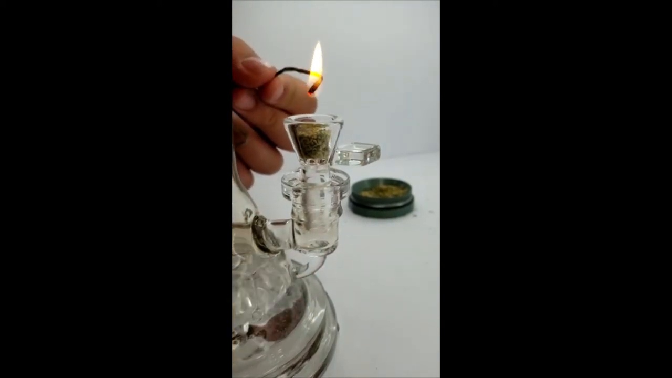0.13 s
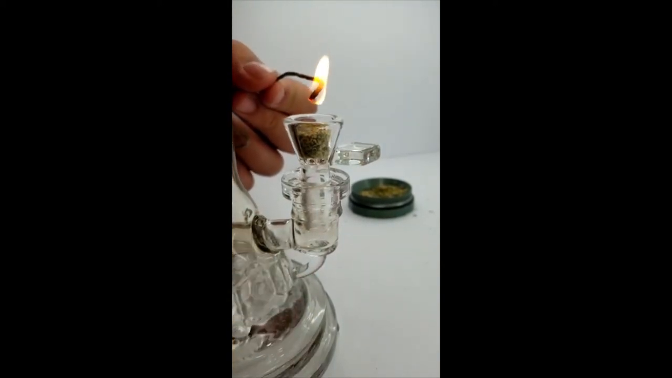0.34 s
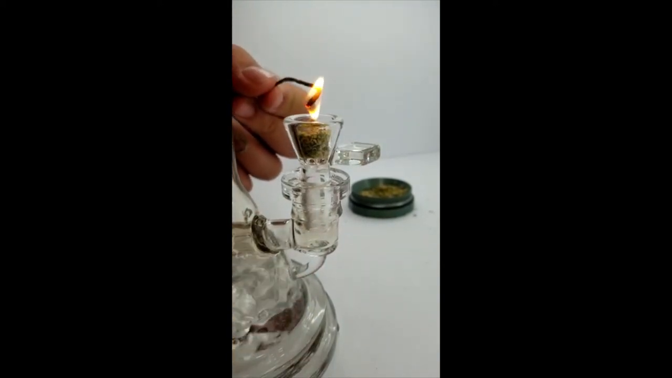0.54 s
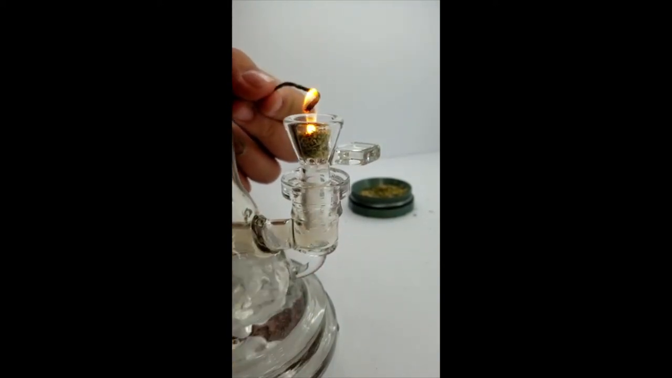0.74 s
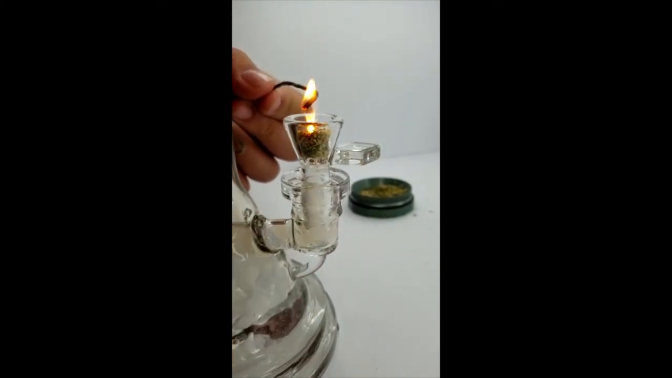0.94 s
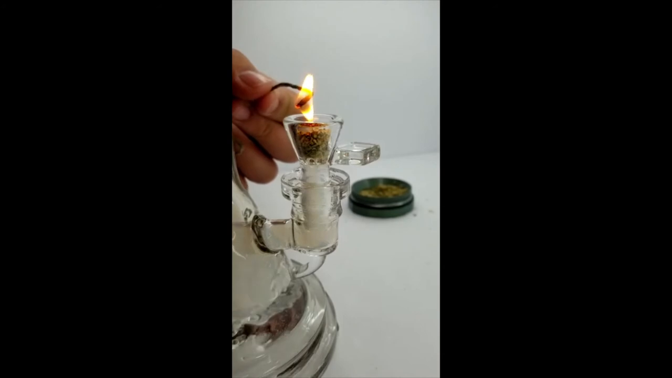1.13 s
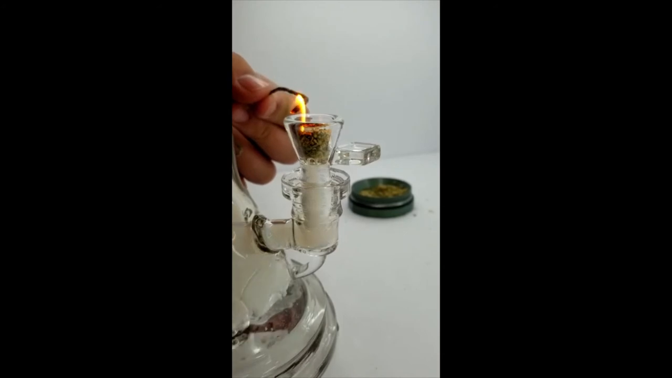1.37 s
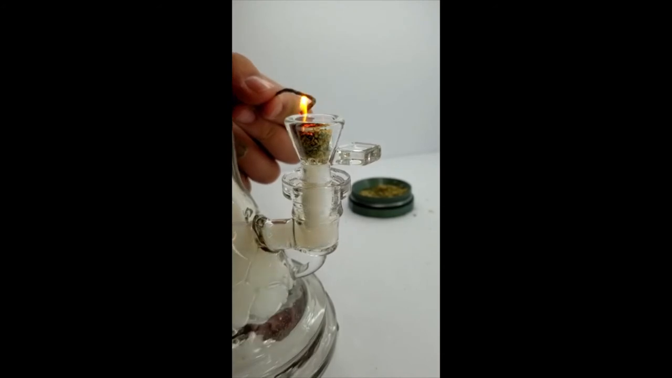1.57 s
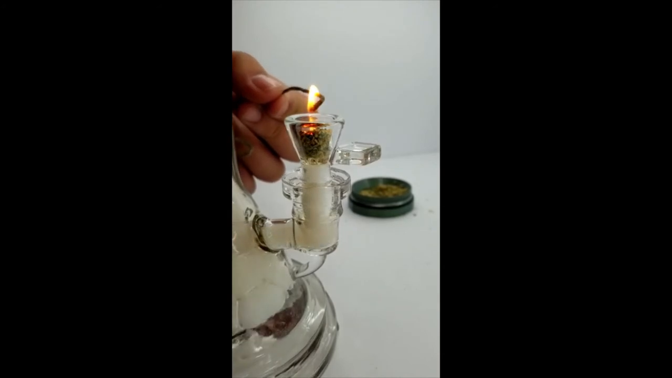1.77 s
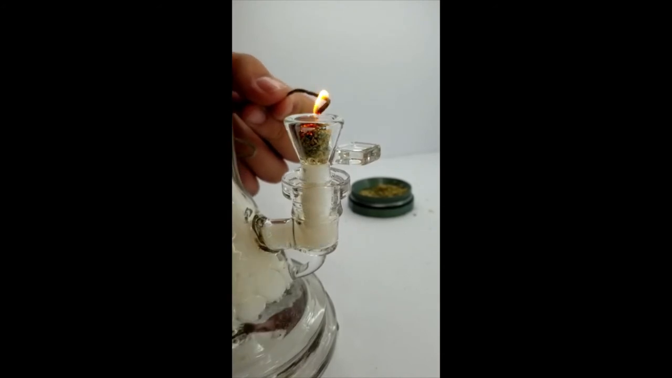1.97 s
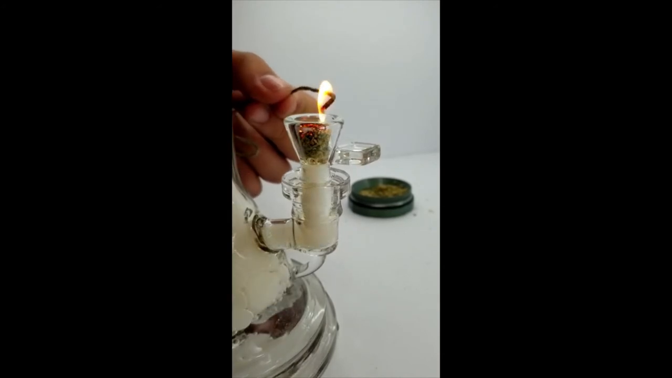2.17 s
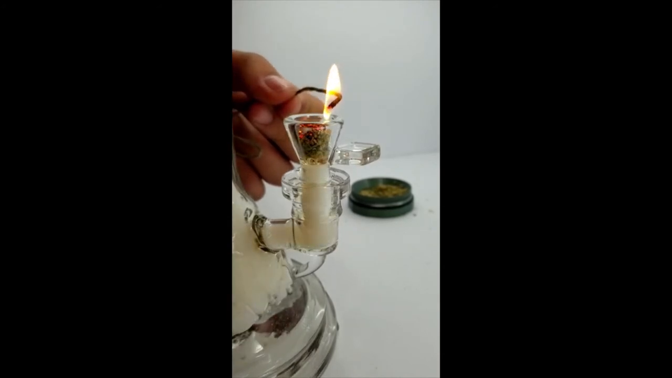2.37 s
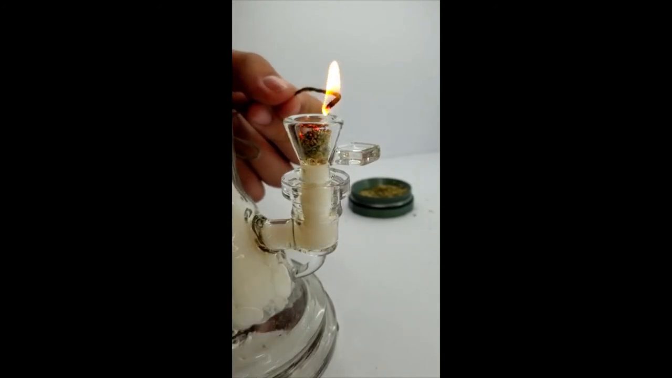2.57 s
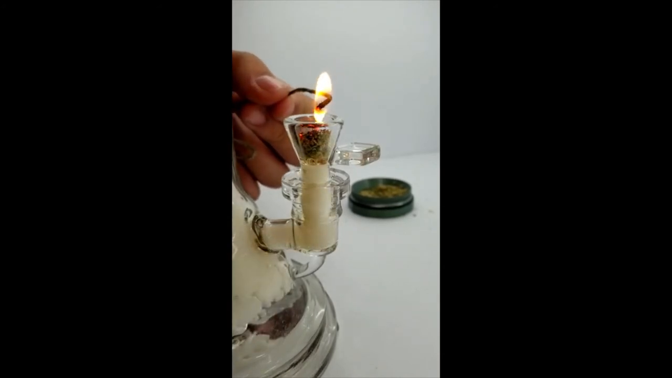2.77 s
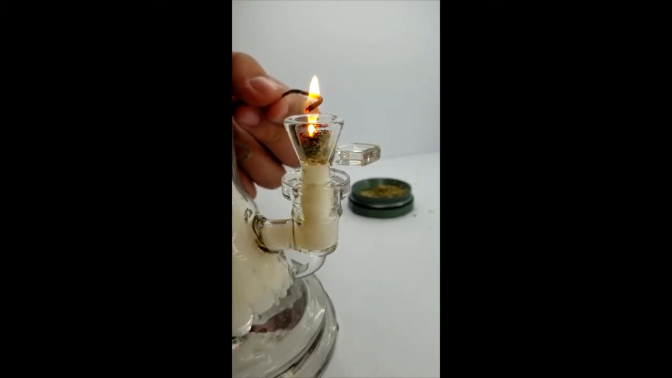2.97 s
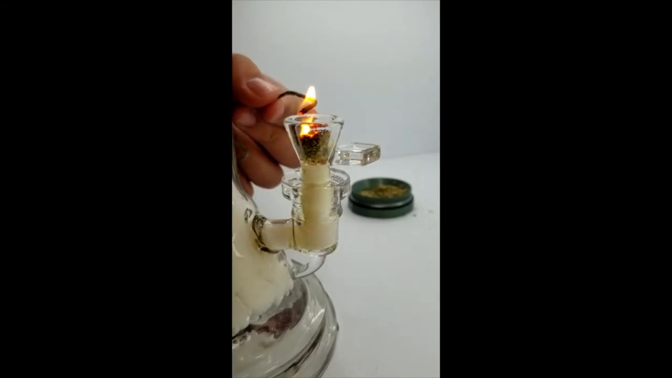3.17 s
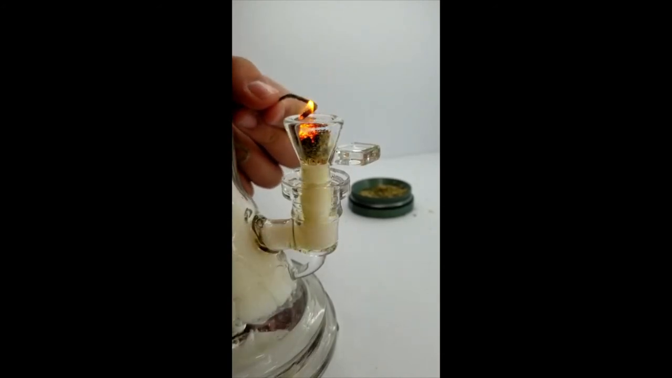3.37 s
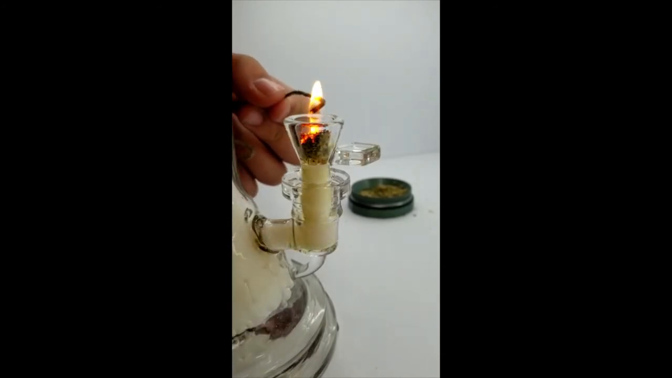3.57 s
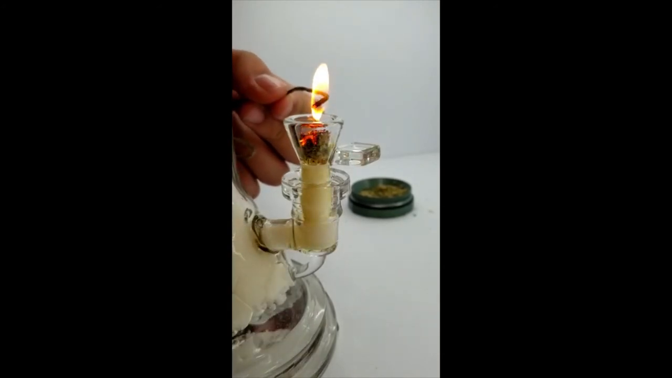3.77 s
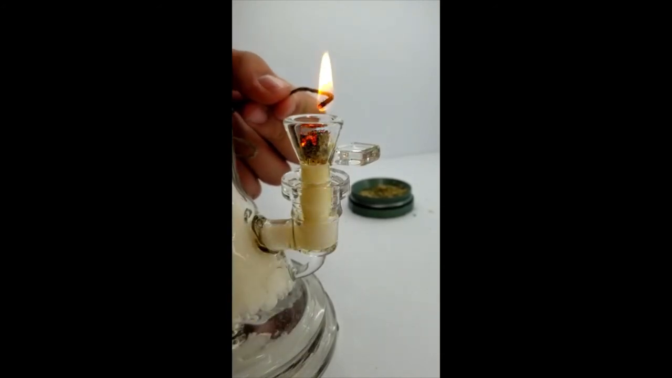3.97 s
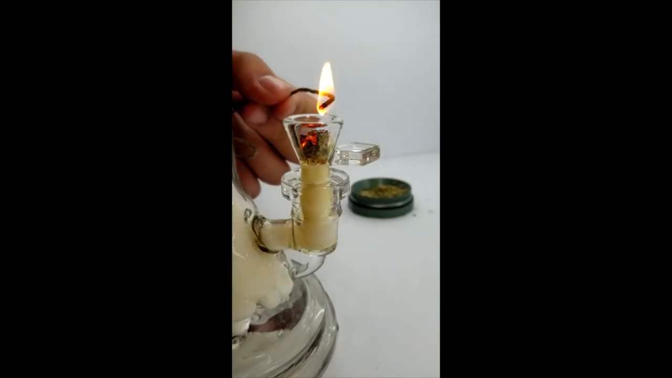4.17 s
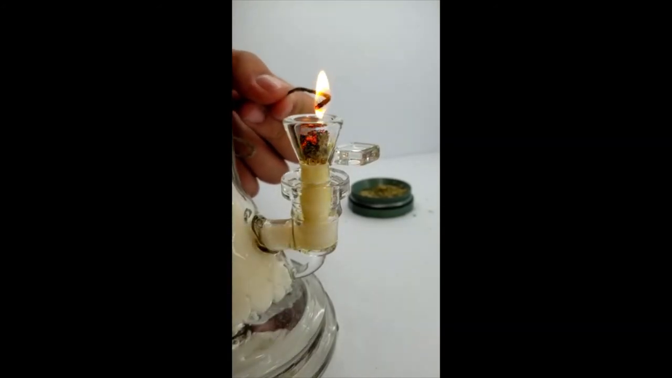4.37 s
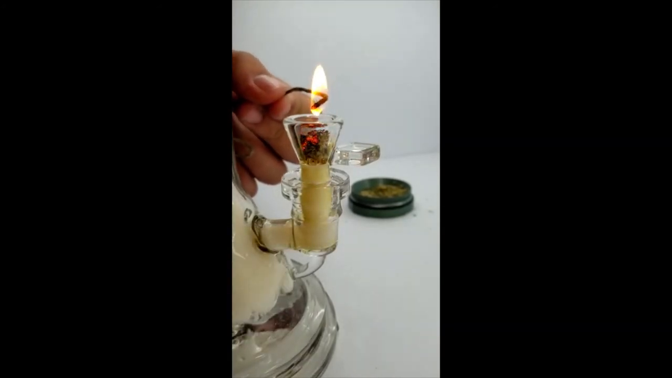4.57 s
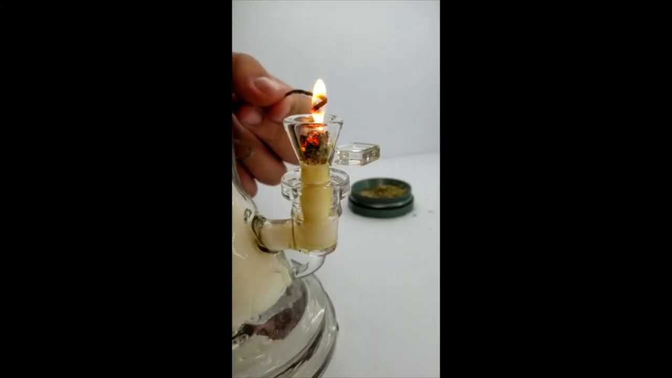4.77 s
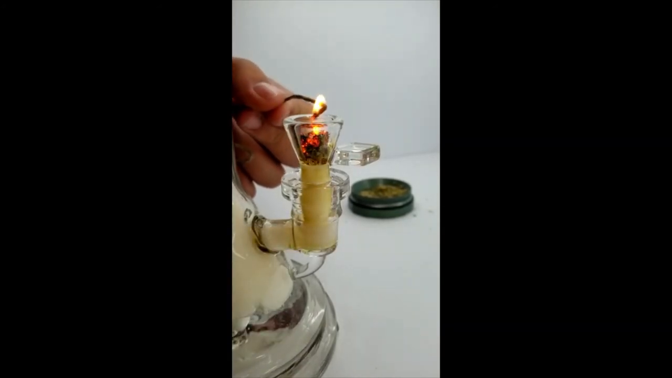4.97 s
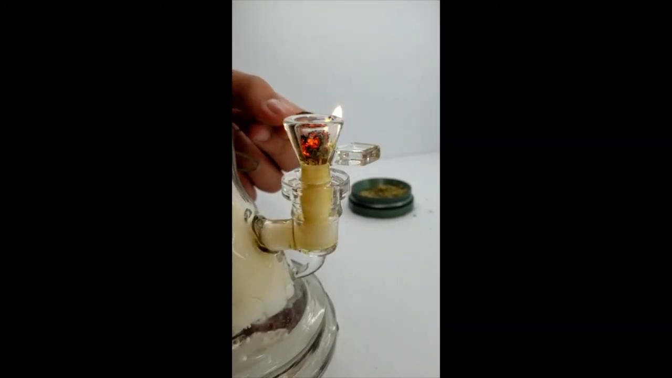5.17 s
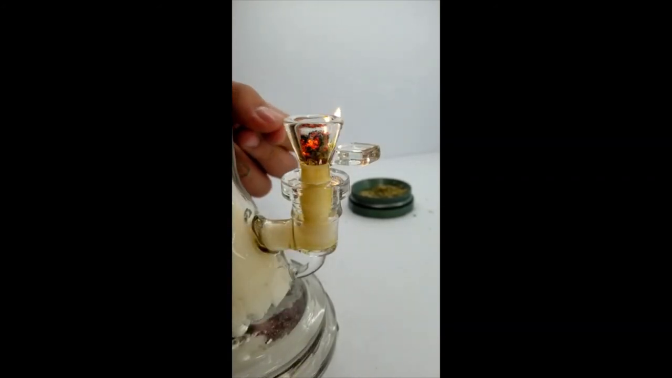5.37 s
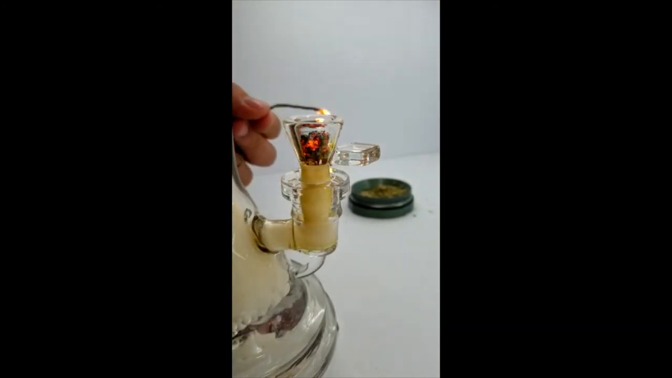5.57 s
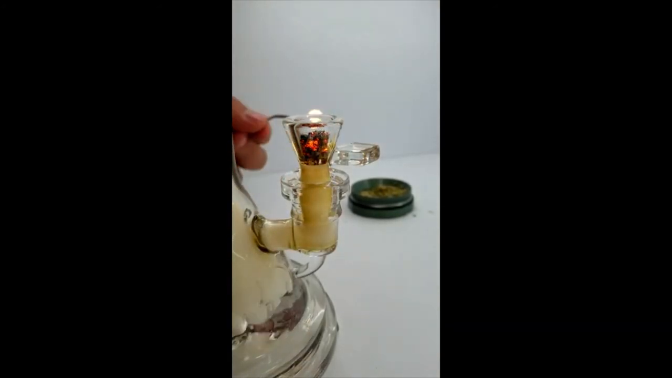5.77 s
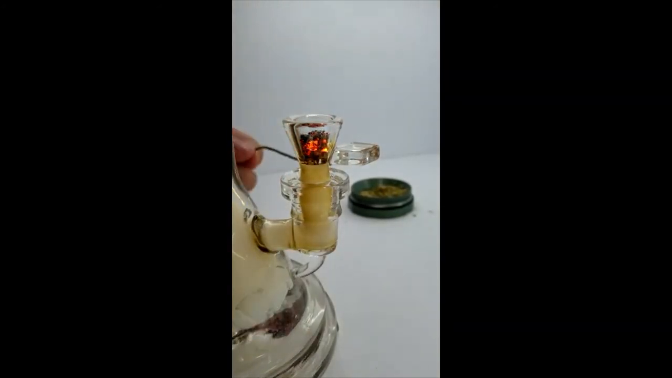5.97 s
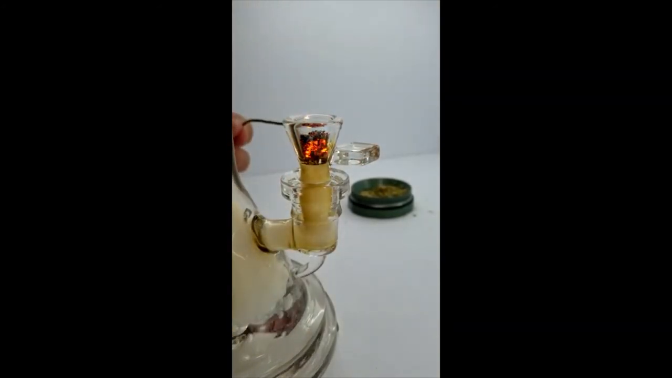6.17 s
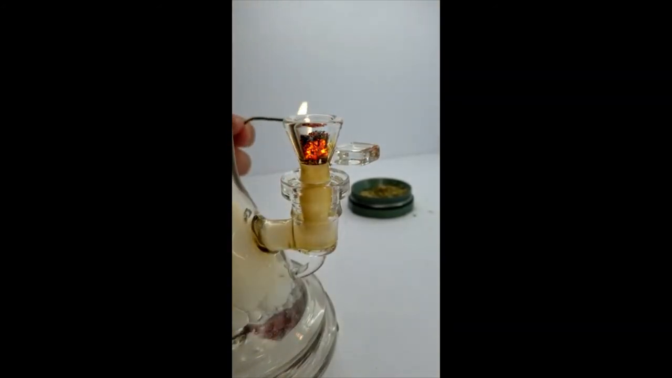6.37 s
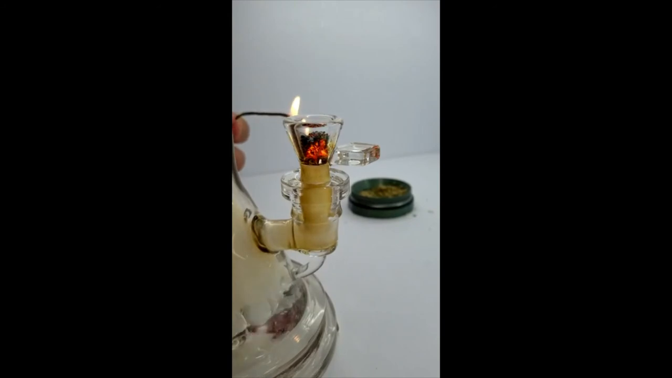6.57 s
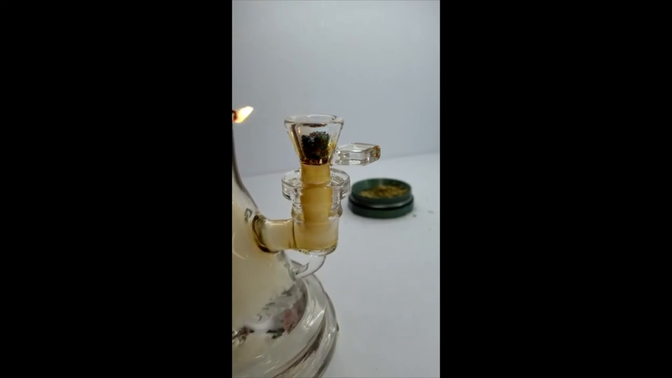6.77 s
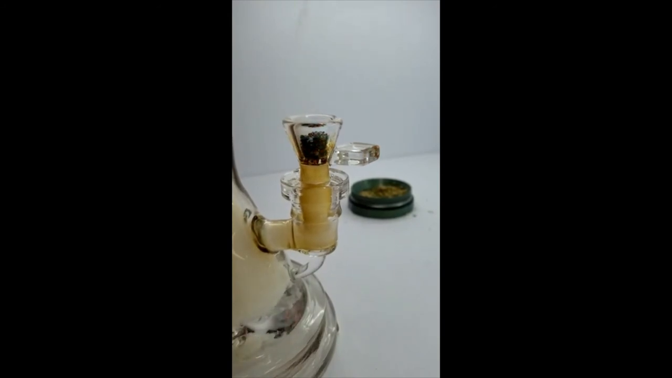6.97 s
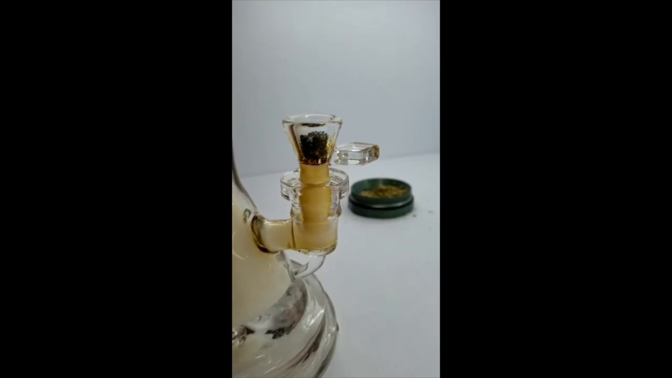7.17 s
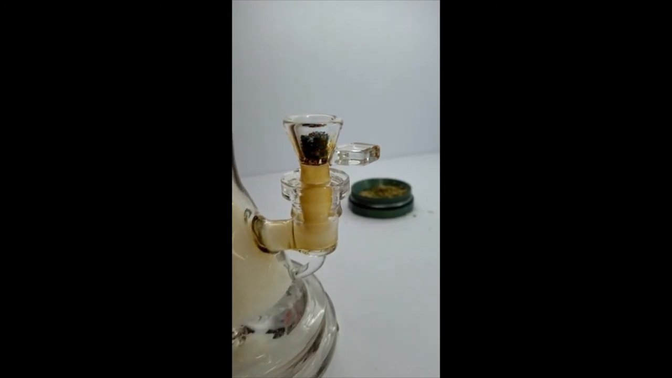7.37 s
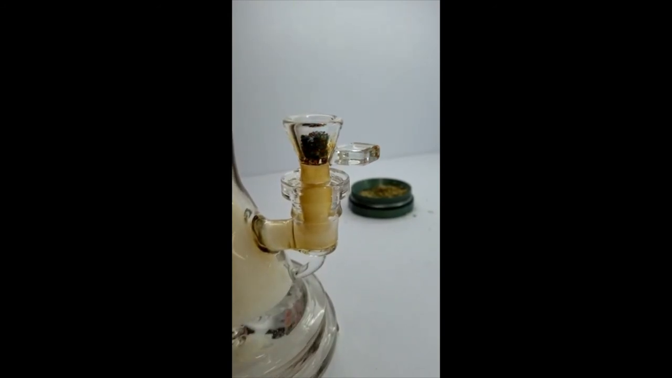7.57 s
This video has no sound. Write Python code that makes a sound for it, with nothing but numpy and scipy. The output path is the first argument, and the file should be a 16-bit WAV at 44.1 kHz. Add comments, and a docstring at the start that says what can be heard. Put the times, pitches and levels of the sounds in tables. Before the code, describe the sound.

Rapid glassy bubbling with soft hiss and ember snaps builds for several seconds, opens into a loud resonant airy rush, then stops abruptly.

```python
"""On a table close by, air is drawn through the water of a glass pipe while a flame is held to its bowl.
Big bubbles jolt the ringing chamber, burst with gliding notes and throw noise-burst spray up the neck.
Drops splash and ping on the glass, foam ticks, and embers snap and crackle as filtered clicks.
Filtered noise hisses through the bowl, grows as it burns clear, and catches hold as the flame arrives.
Once the air hole is uncovered a resonant rush builds; soon after, the flow is cut off steeply."""
import sys
import numpy as np
from scipy import signal
from scipy.fft import rfft, irfft, next_fast_len
from scipy.io import wavfile
from scipy.ndimage import map_coordinates

SR = 44100
rng = np.random.default_rng(int(sys.argv[2]) if len(sys.argv) > 2 else 0)


def master(y):
    """Save y as 16-bit WAV."""
    cut = np.clip(np.atleast_2d(y).T, -1, 1)
    pcm = np.round(cut * 32767)  # scale
    wavfile.write(sys.argv[1], SR, pcm.astype(np.int16))


N = 335601
TIME = np.arange(N) / SR
SIZE = next_fast_len(N, real=True)
FREQS = np.maximum(np.arange(SIZE // 2 + 1) * SR / SIZE, 1)

# biggest bubbles tearing off the stem: (time [s], relative level [dB])
GULPS = [(0.0308, -32), (0.041, -35), (0.1073, -36.5), (0.1561, -31), (0.2475, -35), (0.284, -36),
         (0.382, -39), (0.4606, -35.5), (0.511, -33.5), (0.578, -32), (0.6326, -35), (0.6796, -38),
         (0.7451, -35), (0.757, -43), (0.814, -39), (0.8485, -35.5), (0.915, -34.5), (0.9671, -31),
         (1.076, -39), (1.13, -40.5), (1.1522, -30.5), (1.19, -33), (1.2246, -36), (1.2648, -31.5),
         (1.3153, -35), (1.331, -32.5), (1.3877, -35.5), (1.4395, -35.5), (1.4586, -35.5), (1.5395, -40),
         (1.5991, -36), (1.666, -35), (1.71, -36.5), (1.771, -39.5), (1.88, -36), (1.9808, -37.5),
         (2.04, -35.5), (2.1228, -33.5), (2.185, -31.5), (2.343, -35.5), (2.396, -38), (2.4636, -38),
         (2.519, -36), (2.534, -36), (2.67, -33.5), (2.7348, -36.5), (2.8706, -37), (2.9438, -35.5),
         (3.004, -35), (3.055, -39.5), (3.102, -40), (3.1305, -33.5), (3.222, -39), (3.2797, -39.5),
         (3.3347, -35.5), (3.4084, -36), (3.445, -35), (3.508, -36), (3.6385, -37), (3.668, -36.5),
         (3.7116, -35.5), (3.722, -37.5), (3.73, -36), (3.769, -39), (3.8474, -35), (3.877, -35.5),
         (4.101, -39), (4.276, -39), (4.4204, -36), (4.8578, -39), (4.8821, -36), (4.9317, -34.5),
         (5.271, -43), (6.082, -39), (6.1517, -38), (6.2075, -36), (6.5498, -39.5), (7.019, -32.5),
         (7.121, -34.5)]
# spray resonances of the neck: (frequency [Hz], width [Hz], gain [dB])
NECK = [(720, 230, -4), (1210, 40, -9.5), (1850, 68, -3.5), (3135, 215, -1), (4750, 480, -2)]
# pitches that the glass swallows: (frequency [Hz], width [Hz], gain [dB])
NOTCHES = [(400, 90, -4), (980, 90, -4), (1420, 200, -5), (2250, 450, -3.5), (3900, 420, -19),
           (8800, 1000, -5)]
# brief gusts of air: (time of top [s], rise [s], fall [s], hiss level [dB], hollow level [dB])
GUSTS = [(4.092, 0.0051, 0.01, -45.5, -53), (4.39, 0.083, 0.071, -50, -81),
         (5.962, 0.021, 0.06, -42.5, -41), (6.18, 0.045, 0.066, -69, -48.5),
         (6.463, 0.027, 0.025, -44, -53), (6.564, 0.023, 0.039, -42, -36.5)]
OPEN_S = 6.602  # air hole uncovered


def from_db(db):
    """Decibels to amplitude gain."""
    return 10 ** (np.asarray(db) / 20)


def rms_one(x):
    """Scale to rms 1."""
    return x / np.sqrt(np.mean(x ** 2) + 1e-20)


def decay_pole(t60_s):
    """Per-sample factor that falls 60 dB in t60."""
    return np.exp(-np.log(1000) / (t60_s * SR))


def in_time(rows):
    """Interpolate each column of a curve at every sample."""
    s, *columns = np.transpose(rows)
    return [np.interp(TIME, s, column) for column in columns]


def spectrum_db(points):
    """Interpolate a spectrum over log frequency."""
    hz, db = np.transpose(points)
    return np.interp(np.log(FREQS), np.log(hz), db)


def bumps_db(modes):
    """Sum of peaks or dips of (Hz, width Hz, dB) at every frequency."""
    return sum(db / (1 + (2 * (FREQS - hz) / width_hz) ** 2) for hz, width_hz, db in modes)


def coloured(x, db):
    """Filter a sound by a spectrum in dB."""
    return irfft(rfft(x, SIZE) * from_db(db), SIZE)[..., :N]


def noise(db):
    """Noise of a given spectrum, rms 1."""
    return rms_one(coloured(rng.standard_normal(N), db))


def drift(knots_per_s):
    """Random wander of rms 1, straight between knots."""
    steps = rng.standard_normal(4000)
    return rms_one(np.interp(TIME * knots_per_s, np.arange(len(steps)), steps))


def clipped_normal(n):
    """Normal draws limited to two deviations."""
    return np.clip(rng.standard_normal(n), -2, 2)


def add(out, s, sound):
    """Mix a short sound in at a time."""
    at = int(np.clip(s * SR, 0, N - 1))
    out[at:at + len(sound)] += sound[:N - at]


def clicks(rows):
    """One click for each row of (s, dB, ...)."""
    out = np.zeros(N)
    for s, db, *_ in rows:
        add(out, s, from_db([db]))
    return out


def random_clicks(per_s, spread_db):
    """Clicks at random moments, of uneven size."""
    return (rng.random(N) < per_s / SR) * from_db(spread_db * clipped_normal(N))


def ring(x, hz, t60_s):
    """Two-pole resonator: each click sets off a decaying sine."""
    r, w = from_db(-60 / (t60_s * SR)), 2 * np.pi * hz / SR
    return signal.lfilter([0, np.sin(w)], [1, -2 * r * np.cos(w), r * r], x + 1e-18)


def resonate(x, modes):
    """Parallel resonances of (Hz, width Hz, dB), with dark valleys between them."""
    out = 0
    for hz, width_hz, db in modes:
        out = out + from_db(db) * signal.lfilter(*signal.iirpeak(hz, hz / width_hz, SR), x)
    return out


def bursts(x, t60_s):
    """Every click becomes a dying puff of noise."""
    return signal.lfilter([1], [1, -decay_pole(t60_s)], x + 1e-18) * rng.standard_normal(N)


def glide(hz, length_s, octaves):
    """Tone that glides by some octaves about its middle pitch, fading in and out."""
    u = np.linspace(0, 1, int(length_s * SR))
    pitch_hz = hz * 2 ** (octaves * (u - .5))
    return np.sin(2 * np.pi * np.cumsum(pitch_hz) / SR) * np.sqrt(np.abs(np.sin(np.pi * u)))


def with_gusts(steady_db, tops_db):
    """Power sum of a steady flow and gusts that rise and fall exponentially, in dB."""
    power = from_db(steady_db) ** 2
    for (s, rise_s, fall_s, *_), db in zip(GUSTS, tops_db):
        shape = np.exp(np.maximum(np.minimum((TIME - s) / rise_s, (s - TIME) / fall_s), -20))
        power = power + (from_db(db) * shape) ** 2
    return 10 * np.log10(power)


def draw():
    """One long pull: hole opening from 0 to 1, then levels of churning, hiss and hollow air in dB."""
    # churning of the water: (time [s], relative level [dB])
    churn = [(0.0, -55), (0.78, -48.5), (1.63, -51.5), (2.68, -53), (3.56, -50), (3.93, -56.5),
             (4.31, -51.5), (5.59, -55.5), (6.06, -51.5), (6.5, -56)]
    # air through the bowl: (time [s], hiss level [dB], level of its hollow lower part [dB])
    flow = [(0.56, -62.5, -66.5), (0.93, -67.5, -72.5), (2.11, -63.5, -75.5), (2.56, -63, -67),
            (3.23, -60.5, -74), (3.7, -53.5, -69.5), (3.98, -54.5, -66.5), (4.27, -58, -69.5),
            (4.45, -53.5, -55.5), (4.72, -56.5, -62.5), (4.86, -53, -58.5), (5.38, -52.5, -56.5),
            (5.85, -52.5, -49), (6.32, -51.5, -55), (6.5, -49.5, -51)]
    swell_s, catch_s, catch_db = 0.27, 0.537, 23
    stall_s, stall_width_s, stall_db, thrown_db = 7.4, 0.13, 19, 1.5
    opened = np.clip((TIME - OPEN_S) / swell_s, 0, 1)
    # the rush throws the water about; near the end the churning dips
    stall = np.exp(-((TIME - stall_s) / stall_width_s) ** 2)
    churn_db = in_time(churn)[0] + 4 - stall_db * stall + thrown_db * opened
    hiss_db, hollow_db = in_time(flow) + drift(18)
    *_, hiss_tops_db, hollow_tops_db = np.transpose(GUSTS)
    # the hiss jumps as the flame reaches the bowl
    hiss_db = with_gusts(hiss_db, hiss_tops_db) - catch_db * (TIME < catch_s)
    return opened, churn_db, hiss_db, with_gusts(hollow_db, hollow_tops_db)


def hush():
    """The water hushes while a big bubble swells on the stem: change of small-bubble level, in dB."""
    hush_s, hush_db = 0.02, 3
    starts_s = np.append(np.sort(np.array(GULPS)[:, 0]), np.inf)
    wait_s = starts_s[np.searchsorted(starts_s, TIME)] - TIME
    return -hush_db * np.exp(-wait_s / hush_s)


def jolt(stretch):
    """Pressure as a bubble tears off: a sharp dip, then the water's rebound, while the chamber rings."""
    # air and water in the chamber, at stretch 1: (frequency [Hz], gain [dB], t60 [s])
    chamber = [(165, -18, 0.11), (240, -13.5, 0.054), (743, -6.5, 0.014)]
    drop_width_s, rebound_width_s, rebound_s, rebound_db = .00042, 0.00061, 0.0023, -1
    t = TIME[:SR // 8] * stretch - 3 * drop_width_s
    dip = np.exp(-(t / drop_width_s) ** 2 / 2)
    rebound = from_db(rebound_db) * np.exp(-((t - rebound_s) / rebound_width_s) ** 2 / 2)
    pressure = rebound - dip
    since_s = np.maximum(t + drop_width_s, 0)
    for hz, db, t60_s in chamber:
        decay = np.exp(-np.log(1000) * since_s / t60_s)
        pressure = pressure - from_db(db) * np.sin(2 * np.pi * hz * since_s) * decay
    return pressure


def gulps(churn_db):
    """Each bubble jolts the chamber and throws spray up the neck; smaller ones fall at random."""
    big = clicks(GULPS)
    jolts = from_db(-1) * big + from_db(churn_db) * random_clicks(per_s=120, spread_db=1.5)
    # heaving water changes the chamber's size, so jolts ring higher or lower
    stretches = 1.097 ** np.linspace(-1, 1, 5)
    dealt = rng.integers(0, len(stretches), N)
    thumps = np.zeros(N)
    for k, stretch in enumerate(stretches):
        thumps += signal.oaconvolve(jolts * (dealt == k), jolt(stretch))[:N]
    smooth = signal.sosfilt(signal.butter(2, [66, 1200], "band", fs=SR, output="sos"), thumps)
    spray = bursts(jolts * from_db(2.5 * clipped_normal(N)), t60_s=0.026)
    # the film of a big bubble breaks with a dry pop
    pop = bursts(big * from_db(3 * clipped_normal(N)), t60_s=0.0037)
    return smooth + from_db(-7) * resonate(spray, NECK) + resonate(pop, [(1600, 1600, -11)])


def bloops(churn_db):
    """Bursting bubbles sing short rising notes among many faint blips that bend either way."""
    # loudest notes: (time of middle [s], relative level [dB], pitch [Hz], rise [octaves/s])
    notes = [(0.041, -46.5, 710, 22.5), (0.258, -45, 660, 12.8), (0.293, -43.5, 663, 32),
             (0.357, -47, 720, 32.5), (0.824, -50, 720, 25), (0.94, -46, 566, 13.3),
             (0.977, -49.5, 763, 30), (1.112, -48.5, 589, 14), (1.165, -44.5, 623, 20),
             (1.213, -38, 658, 45), (1.271, -44.5, 669, 23), (1.334, -46, 619, 25.5), (1.474, -54, 600, 19),
             (1.588, -51, 720, 40), (1.676, -40, 672, 52), (1.726, -47, 680, 45), (1.9, -42.5, 650, 33),
             (1.992, -52, 635, 28), (2.319, -39, 660, 51), (2.36, -45, 660, 42.0), (2.399, -43.5, 700, 48),
             (2.478, -43.5, 632, 23), (2.724, -40, 692, 51), (2.957, -40, 670, 35),
             (3.139, -43.5, 642, 15.5), (3.229, -50.5, 699, 25), (3.524, -43, 720, 45),
             (3.648, -49, 747, 30.6), (3.792, -44.5, 720, 37), (4.07, -48.5, 677, 19.5),
             (4.138, -47, 812, 35), (4.192, -47, 770, 45), (4.343, -47.5, 800, 40), (4.418, -48, 702, 33.7),
             (4.662, -48, 780, 50), (4.873, -46, 680, 45), (4.945, -52, 770, 31), (5.355, -49, 756, 25),
             (5.476, -49, 617, 21), (6.158, -52, 568, 25.5), (6.558, -42.5, 554, 10.1)]
    note_s, fast_octaves_per_s = 0.03595, 26.03
    faint_db, faint_hz, faint_octaves_per_s, faint_s, faint_count = -8.5, 680, 35, 0.0158, 280
    # the faster a note rises, the shorter it is
    rows = [(*note, note_s / np.hypot(1, note[3] / fast_octaves_per_s)) for note in notes]
    for when, size, strength, bend, length in rng.random((faint_count, 5)):
        db = churn_db[int(when * N)] + faint_db + 10 * (strength - .5)
        hz = faint_hz * 2 ** (0.644 * (size - .5))
        rise = faint_octaves_per_s * (2 * bend - .5)
        rows.append((when * N / SR, db, hz, rise, faint_s * (.5 + length)))
    out = np.zeros(N)
    for s, db, hz, rise, lasts_s in rows:
        add(out, s - lasts_s / 2, from_db(db - 0.34) * glide(hz, lasts_s, rise * lasts_s))
    # the heaving surface makes every note unsteady
    return out * (1 + .42 * drift(330))


def drops(churn_db):
    """A drop splashes on the glass and leaves a tiny bubble ringing, rising a little in pitch."""
    # loudest drops: (time [s], relative level [dB], starting pitch [Hz])
    loud_drops = [(0.0403, -50, 3210), (0.1246, -46, 3360), (0.1715, -33, 1850), (0.2845, -41.5, 5070),
                  (0.5232, -42, 3030), (0.818, -42, 5130), (0.841, -41, 3150), (1.0565, -40, 5170),
                  (1.545, -41, 5100), (1.6706, -40.5, 5000), (1.8816, -45.5, 3260), (1.9739, -31, 3220),
                  (2.517, -41.5, 3200), (2.5975, -48, 3260), (2.8943, -36.5, 1270), (3.0565, -49, 3170),
                  (3.2979, -41, 3130), (3.5713, -38.5, 1250), (3.6314, -42.5, 1220), (3.702, -36, 1770),
                  (3.7683, -38, 1260), (4.2802, -36.5, 5260), (4.388, -39.5, 2980), (4.668, -41, 1210)]
    # pitches that small drops favour, before detuning: (frequency [Hz])
    pitches_hz = [1850, 2500, 2930, 5350, 7440]
    ping_db, splash_db, small_db, small_count = -4.5, -2.5, -6, 130
    ping_t60_s, splash_t60_s, rise_per_s = 0.029, 0.033, 4
    rows = list(loud_drops)
    for when, size, which, detune in rng.random((small_count, 4)):
        hz = pitches_hz[int(len(pitches_hz) * which)] * (.88 + .24 * detune)
        db = churn_db[int(when * N)] + small_db + 8 * (size - .5)
        rows.append((when * N / SR, db, hz))
    splashes = from_db(splash_db) * resonate(bursts(clicks(rows), splash_t60_s), NECK)
    pings, t = np.zeros(N), TIME[:SR // 16]
    decay = np.exp(-np.log(1000) * t / ping_t60_s)
    for s, db, hz in rows:
        phase = 2 * np.pi * hz * (t + rise_per_s * t * t / 2)
        add(pings, s, from_db(db + ping_db) * np.sin(phase) * decay)
    return splashes + pings * (1 + .6 * drift(600))


def fizz(churn_db):
    """Tiny foam bubbles tick at random pitches; those in tune with the neck come out loudest."""
    pitches_hz = np.geomspace(1100, 6000, 24)
    ticks = from_db(churn_db - 11) * random_clicks(per_s=270, spread_db=8.0)
    dealt = rng.integers(0, len(pitches_hz), N)
    foam = sum(ring(ticks * (dealt == k), hz, t60_s=0.016) for k, hz in enumerate(pitches_hz))
    return resonate(foam, NECK)


def surge(surge_db, t60_s):
    """The extra air that each big bubble lets through, dying away."""
    return from_db(surge_db) * signal.lfilter([1], [1, -decay_pole(t60_s)], clicks(GULPS) + 1e-18)


def from_bowl(x, lag_s=0.000535):
    """The left side hears the sound first, the right a little later."""
    return np.array([x, np.interp(TIME - lag_s, TIME, x, left=0)])


def room(x, wet_db, t60_s):
    """Dense reflections of a small room: decaying noise, different on each side."""
    t = TIME[:SR // 2]
    tails = rng.standard_normal((2, len(t))) * np.exp(-np.log(1000) * t / t60_s) * (t > .001)
    tails /= np.sqrt(np.sum(tails ** 2, axis=1, keepdims=True))
    return from_db(wet_db) * signal.fftconvolve(x[None], tails, axes=1)[:, :N]


def wide_noise(db, shared=0.41):
    """Noise partly direct and later on the right, partly scattered and unlike on the two sides."""
    direct = noise(db)
    near = rms_one(from_bowl(direct) + room(direct, wet_db=-5, t60_s=.03))
    scattered = np.array([noise(db), noise(db)])
    return np.sqrt(shared) * near + np.sqrt(1 - shared) * scattered


def air(hiss_db, hollow_db):
    """Air hisses through the packed bowl; slow flow surges with each bubble, fast flow runs more evenly."""
    # spectrum of the hiss: (frequency [Hz], density [dB])
    hiss_spectrum = [(2500, -49), (4200, 4), (5700, 10), (6200, 7.5), (7400, 5.5), (8900, 4), (11000, 4),
                     (13200, 9), (15800, 7)]
    # spectrum of the hollow lower part: (frequency [Hz], density [dB])
    hollow_spectrum = [(400, -13), (520, -1.5), (780, 0), (920, -2.5), (1210, 4), (1340, -4), (1600, 0.5),
                       (3200, 2), (3900, -6.5), (5700, 2.5), (6500, -23)]
    unsteady = np.interp(hiss_db, [-60, -50], [1, .4])
    hiss = from_db(hiss_db + 2) * wide_noise(spectrum_db(hiss_spectrum) + bumps_db(NOTCHES))
    hollow = from_db(hollow_db + 3 * unsteady * drift(25)) * wide_noise(spectrum_db(hollow_spectrum))
    surging = hollow * (1 + unsteady ** 2 * surge(45, t60_s=0.028))
    return (hiss + surging) * from_db(2 * unsteady * drift(70))


def air_speed():
    """The air gathers speed once the hole is open, from 0 to 1 in 0.29 s."""
    return np.clip((TIME - OPEN_S) / .29, 0, 1)


def climbing(x):
    """Play 5 % slow at first, so all peaks and hollows slide up with the air's speed."""
    position = np.cumsum(1 - .05 * (1 - air_speed()))
    return np.array([map_coordinates(side, [position], order=3) for side in x])


def flares(opened):
    """Hollow, breathy tones of the jet: randomly modulated carriers that climb with air speed."""
    # turbulent resonances: (pitch at opening [Hz], pitch at full speed [Hz], width [Hz], level [dB])
    tones = [(489.5, 580, 120, -53.5), (1720, 1800, 150, -58), (4400, 4720, 260, -48.5)]
    swell_db = 10
    speed, out = air_speed(), 0
    for start_hz, full_hz, width_hz, db in tones:
        phase = 2 * np.pi * np.cumsum(start_hz + (full_hz - start_hz) * speed) / SR
        tone = drift(1.5 * width_hz) * np.cos(phase) + drift(1.5 * width_hz) * np.sin(phase)
        out = out + from_db(db - swell_db * (1 - opened) + 2 * speed * drift(30)) * tone
    return out


def rush(opened, churn_db):
    """Fast air through the open hole rings the tube, thrown water rumbles; all surge with big bubbles."""
    # glass tube resonances, before the ring boost: (frequency [Hz], width [Hz], gain [dB])
    stem = [(3550, 170, -4), (5250, 57, -4), (6650, 120, -1), (7480, 89, -3), (8170, 55, -3),
            (10700, 58, -3), (11200, 120, -3), (11900, 110, -3), (13100, 80, -2), (13700, 74, -2)]
    # peaks and hollows of the pipe's body: (frequency [Hz], width [Hz], gain [dB])
    body = [(390, 70, -7), (485, 70, 6), (735, 80, -15), (850, 90, 5), (1050, 170, -11), (1200, 70, 5),
            (1730, 150, 5), (2180, 110, -7), (4120, 200, -8)]
    # spectrum of the jet: (frequency [Hz], density [dB])
    jet_spectrum = [(300, -44), (490, 2), (740, -0.5), (1080, -4.5), (2250, -4), (2900, 0.5), (4100, -2.5),
                    (4450, 2), (5800, 3.5), (9300, -3.5), (10800, 1), (15800, 4)]
    # spectrum of the thrown water: (frequency [Hz], density [dB])
    rumble_spectrum = [(30, -35), (88, -8), (135, -9.5), (240, -11), (400, -23), (1000, -59.5)]
    ring_db, jet_db, swell_db = 8.5, -31.5, 13.5
    tube_db = bumps_db([(hz, width_hz, db + ring_db) for hz, width_hz, db in stem]) + bumps_db(body)
    level_db = jet_db - swell_db * (1 - opened) + 0.8 * drift(60)
    jet = from_db(level_db) * climbing(wide_noise(spectrum_db(jet_spectrum) + tube_db))
    rumble = from_db(churn_db - 4.5 + 3.5 * drift(32)) * noise(spectrum_db(rumble_spectrum))
    extra = surge(30, t60_s=0.15)
    low = flares(opened) + opened ** 4 * rumble
    return np.minimum(10 * opened, 1) * (jet * (1 + extra / 2) + low * (1 + extra))


def embers(hiss_db):
    """Sharp snaps over a fine crackle that fades as the bowl burns clear."""
    # loudest embers snapping: (time [s], relative level [dB])
    snaps = [(1.8312, -39), (2.395, -40), (2.6703, -39.5), (2.94, -32), (2.9754, -34), (3.4316, -34.5),
             (4.314, -43), (4.4358, -33.5), (5.0091, -33), (5.2944, -35), (5.596, -32.5), (7.5353, -50)]
    burning = np.interp(TIME, [.45, .6, 5, 6.5], [0, 1, 1, 0])
    crackle = burning * from_db(hiss_db - 3) * random_clicks(per_s=74, spread_db=11.0)
    sparks = from_db(1) * clicks(snaps) + crackle
    # a fibre breaks with one hard crack, then lets out a puff of vapour
    crack = signal.sosfilt(signal.butter(2, 8000, "high", fs=SR, output="sos"), sparks)
    puff_noise = bursts(sparks, t60_s=0.0058)
    puff = signal.sosfilt(signal.butter(1, 4000, "high", fs=SR, output="sos"), puff_noise)
    return from_db(12) * crack + puff


def whistle():
    """A gap opens in the embers with one thin, falling whistle."""
    out = np.zeros(N)
    add(out, 5.963, from_db(-41) * glide(14200, .022, octaves=-.46))
    return out


def glow():
    """Air whistles thinly through glowing embers: a high noise band that swells and fades."""
    top_s, width_s, level_db = 5.965, 0.34, -46.5
    mode = [(12700, 3100, 0)]
    band = rms_one(resonate(resonate(rng.standard_normal((2, N)), mode), mode))
    return from_db(level_db) * np.exp(-((TIME - top_s) / width_s) ** 2) * band


def background():
    """Quiet, steady noise, independent on each side."""
    # background spectrum: (frequency [Hz], density [dB])
    quiet = [(30, 2), (125, 8.5), (250, -12), (2700, -15), (4000, -20), (5600, -9.5), (9200, -16),
             (16000, -9)]
    return from_db(-68.0) * np.array([noise(spectrum_db(quiet)) for side in range(2)])


def placed(x, balance):
    """Shape stereo width by pitch, then lean each pitch to its side."""
    # gain of the side signal: (frequency [Hz], gain [dB])
    side_gain = [(150, -2.5), (500, -10.5), (1200, 0.5)]
    mid = (x[0] + x[1]) / 2
    side = coloured((x[0] - x[1]) / 2, spectrum_db(side_gain))
    lean_db = spectrum_db(balance) * np.array([[.5], [-.5]])
    return coloured(np.array([mid + side, mid - side]), lean_db)


def scene():
    """Water, bowl and rush, each with its own lag and reflections; water and bowl share one stereo balance and
    the rush has its own, over a quiet background."""
    # left minus right for water and bowl: (frequency [Hz], difference [dB])
    pipe_balance = [(60, 3), (150, 5.5), (240, 6), (380, 6), (600, 1.5), (950, -8.5), (2380, -7.5),
                    (3770, -14.5), (5980, -1), (9470, 7.5), (15000, 4)]
    # left minus right for the rush: (frequency [Hz], difference [dB])
    rush_balance = [(95, 10), (150, 3), (240, 1), (380, 18.5), (600, -6), (950, -5), (1500, -12),
                    (2380, -6), (3770, -9), (5980, -2), (9470, 6.5), (15000, 2)]
    stop_s, release_db_per_s, bypass_db = 7.245, 663, 2.5
    opened, churn_db, hiss_db, hollow_db = draw()
    ending_db = -release_db_per_s * np.maximum(TIME - stop_s, 0)
    stir_db = churn_db + ending_db
    small_db = stir_db + hush()
    water = gulps(small_db) + fizz(small_db) + drops(stir_db) + bloops(small_db)
    water = coloured(water, bumps_db(NOTCHES))
    bowl = coloured(embers(hiss_db) + whistle(), bumps_db(NOTCHES))
    # the open hole takes air away from the bowl
    flow = from_db(ending_db - bypass_db * opened) * air(hiss_db, hollow_db) + glow()
    pipe = flow + from_bowl(water, lag_s=0.00031) + room(water, wet_db=-5.5, t60_s=0.12)
    pipe = pipe + from_bowl(bowl) + room(bowl, wet_db=2.5, t60_s=0.05)
    clearing = from_db(ending_db) * rush(opened, churn_db)
    clearing = clearing + room(clearing[0], wet_db=-25.0, t60_s=0.74)
    return placed(pipe, pipe_balance) + placed(clearing, rush_balance) + background()


def record(dry):
    """The deep bass rolls off below 58 Hz and the top is cut steeply at 15.9 kHz."""
    thinned = signal.sosfilt(signal.butter(2, 58, "high", fs=SR, output="sos"), dry)
    return signal.sosfilt(signal.ellip(12, .1, 80, 15900, fs=SR, output="sos"), thinned)


dry = scene()
out = record(dry)
master(out)
```